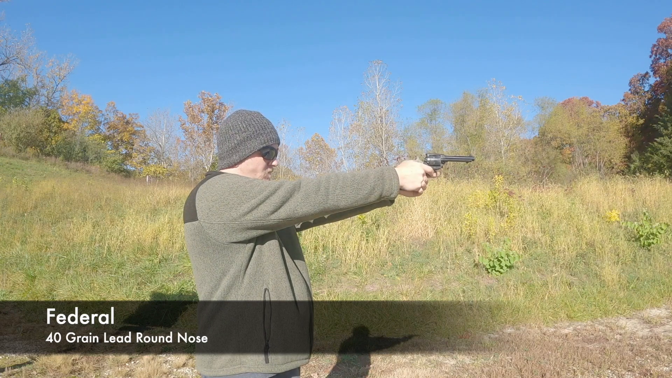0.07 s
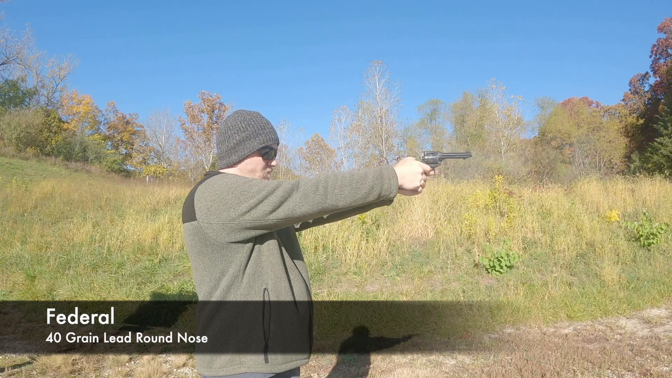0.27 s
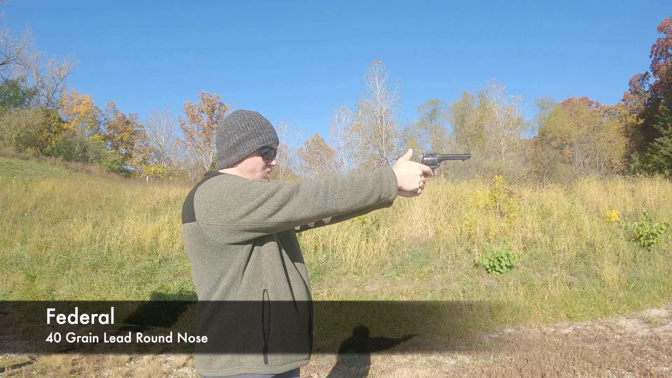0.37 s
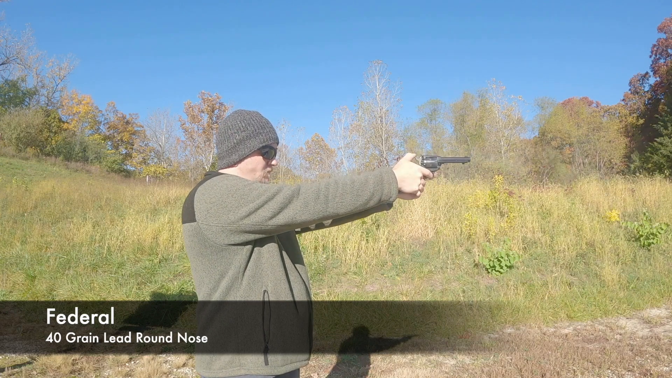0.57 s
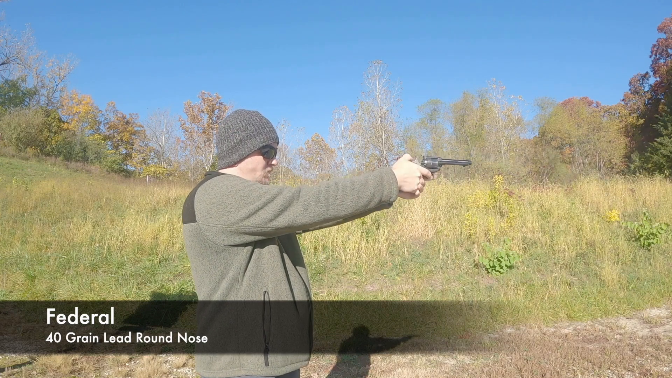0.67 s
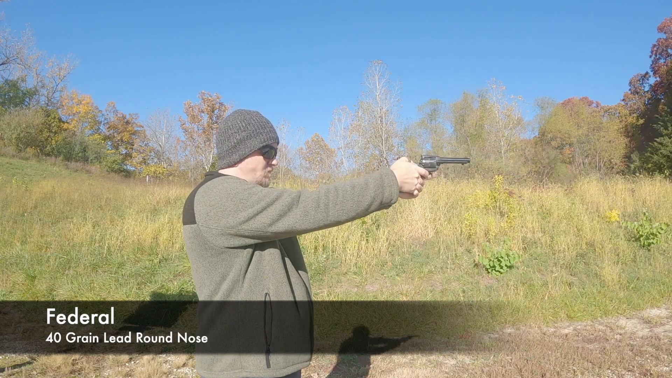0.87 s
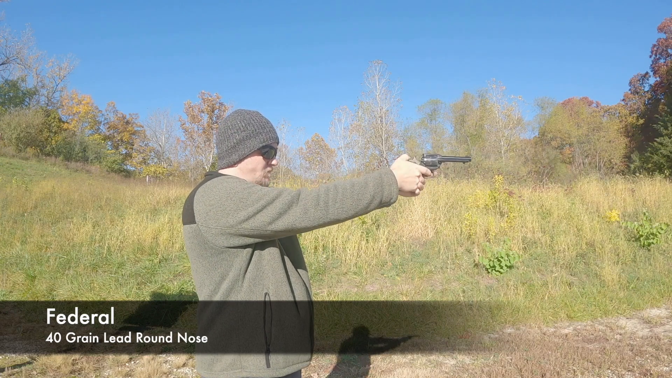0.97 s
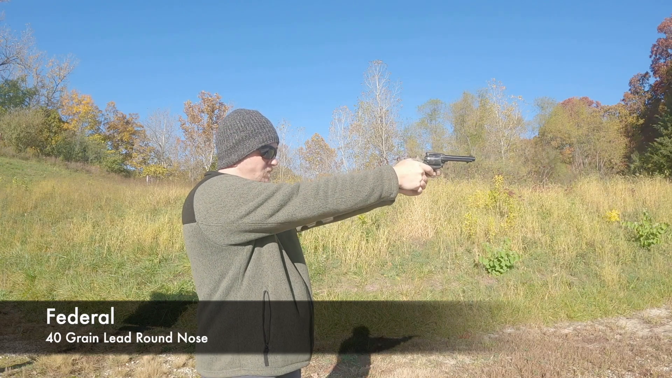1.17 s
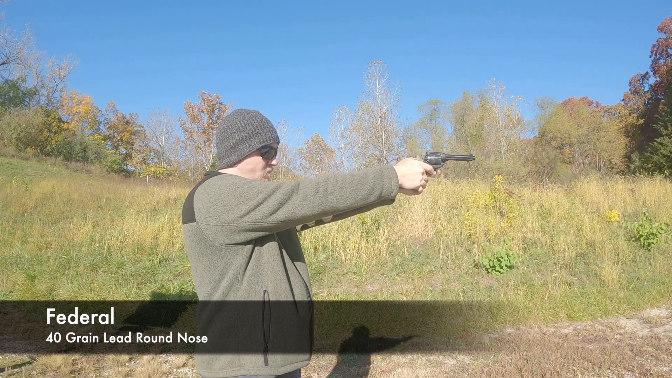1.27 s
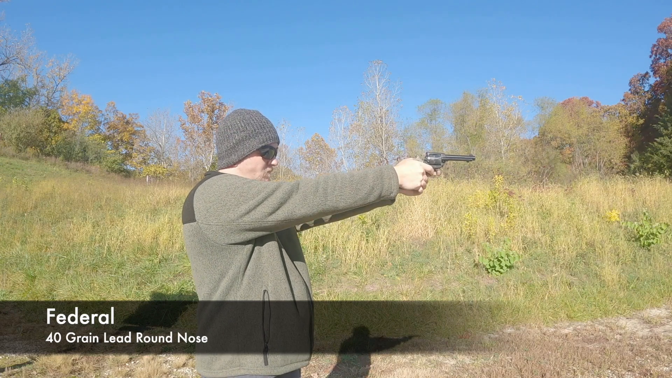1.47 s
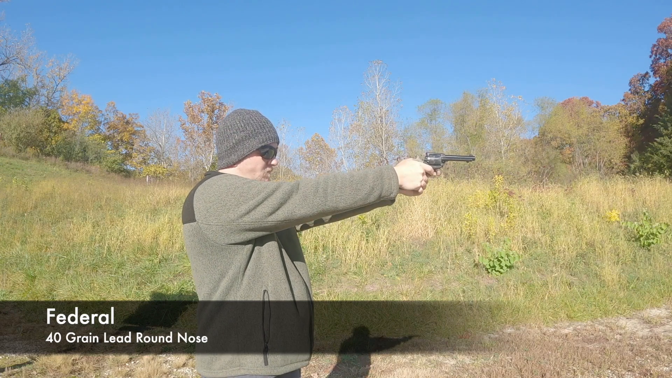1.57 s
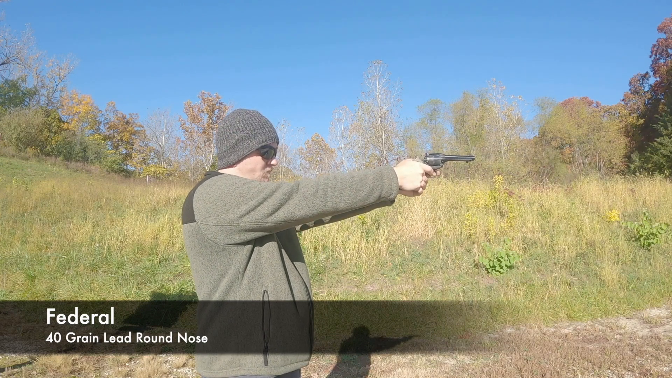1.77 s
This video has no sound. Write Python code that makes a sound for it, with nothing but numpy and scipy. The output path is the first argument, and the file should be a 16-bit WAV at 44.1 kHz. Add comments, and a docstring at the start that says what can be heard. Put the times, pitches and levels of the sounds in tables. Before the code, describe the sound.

One small revolver shot, close and overloading the microphone, arrives as a quick stutter of growing cracks; sharp slaps and a dulling tree-line echo follow, with tiny hammer clicks over a quiet, insect-filled meadow.

```python
"""An autumn meadow: one shot from a small revolver, close to the microphone.
The report stutters in a quick run of growing cracks, built from filtered impulses, and overloads the microphone.
A bank slaps back and slopes near and far return soft thuds, all short noise bursts; the tree line
answers with a long noise wash that dulls as it recedes. The hammer is cocked again with small steel
clicks of decaying sines; insects trill in narrow noise bands and swept tones over faint moving air."""
import sys
import numpy as np
from scipy import signal
from scipy.fft import rfft, irfft, next_fast_len
from scipy.io import wavfile
from scipy.ndimage import uniform_filter1d, map_coordinates

SR = 44100
rng = np.random.default_rng(int(sys.argv[2]) if len(sys.argv) > 2 else 0)


def digitize_waveform(pressure):
    """Quantize a signal to 16-bit integers and store it at the path in sys.argv[1].

    Rows of a 2-D input are taken as channels; values are limited to [-1, 1].
    """
    field = np.atleast_2d(pressure).T
    bounded = np.clip(field, -1, 1)
    quanta = np.round(bounded * 32767).astype(np.int16)
    wavfile.write(sys.argv[1], SR, quanta)


N = 79380  # samples, 1.8 s

SHOT_S = .22815  # the last crack of the stutter


def amp(db):
    """Amplitude factor of a level in dB."""
    return 10 ** (np.asarray(db) / 20)


def unit(x):
    """x scaled to rms 1."""
    return x / np.sqrt(np.mean(x ** 2) + 1e-20)


def clock():
    """Time of every sample in seconds."""
    return np.arange(N) / SR


def along(points, hz):
    """Interpolate (Hz, value) points on a log frequency axis."""
    f, v = np.transpose(points)
    return np.interp(np.log(hz + 1), np.log(f + 1), v)


def filtered(x, gain, causal=False):
    """x times a gain of frequency; a causal one rings only after each hit."""
    m = 2 * next_fast_len(N)
    g = gain(np.fft.rfftfreq(m, 1 / SR))
    if causal:
        # Folding the cepstrum forward in time gives minimum phase.
        cepstrum = irfft(np.log(np.maximum(g, 1e-6)), m)
        cepstrum[1:m // 2] *= 2
        cepstrum[m // 2 + 1:] = 0
        g = np.exp(rfft(cepstrum))
    return irfft(rfft(x, m) * g, m)[..., :N]


def dulled(x, edge_hz):
    """Causal low-pass."""
    return filtered(x, lambda f: 1 / np.sqrt(1 + (f / edge_hz) ** 6), causal=True)


def delayed(x, s):
    """x, s seconds later."""
    return filtered(x, lambda f: np.exp(-2j * np.pi * f * s))


def noise(gain):
    """Coloured noise of rms 1."""
    return unit(filtered(rng.standard_normal(N), gain))


def hiss(points):
    """Noise of rms 1 with a (Hz, dB) colour."""
    return noise(lambda f: amp(along(points, f)))


def bell(x, centre, width):
    """Gaussian bump with a peak of 1; width is its standard deviation."""
    return np.exp(-.5 * ((x - centre) / width) ** 2)


def fade(t, t60):
    """Silence before t = 0, then a steady decay of 60 dB in t60 seconds."""
    return (t >= 0) * np.exp(-np.log(1000) * np.abs(t) / t60)


def meadow():
    """Faint air, steady insect trills and one insect whose quick chirps each fall in pitch."""
    # Colour of the air. Each row: frequency in Hz, relative level in dB.
    air_colour = [(30, -29.5), (100, -31.5), (160, -5.5), (280, -8), (600, 4), (1000, -3.5), (1500, -5),
                  (2500, -13), (5000, -25), (8000, -30.5), (9500, -47), (15000, -49.5)]
    air_db = -60
    # Insect trills. Each row: start in seconds, end in seconds, centre in Hz, level in dB.
    trill_rows = [(-.1, .22, 6985, -69.5), (1.58, 1.9, 7150, -74)]
    trill_width_hz = 90
    chirp_hz, chirp_fall_hz, chirp_width_hz = 7570, 750, 90
    chirps_per_s, chirp_db = 27, -77

    t = clock()
    trills = 0
    for start, end, hz, db in trill_rows:
        gate = uniform_filter1d(1. * (t > start) * (t < end), size=2000)  # softened ends
        trills = trills + amp(db) * gate * noise(lambda f: bell(f, hz, trill_width_hz))

    stroke = (chirps_per_s * t) % 1  # 0 to 1 through each chirp
    pitch_hz = chirp_hz - chirp_fall_hz * (stroke - .5)
    tone = np.sin(2 * np.pi * np.cumsum(pitch_hz) / SR)
    flutter = noise(lambda f: bell(f, 0, chirp_width_hz))  # slow noise roughens the tone
    chirps = tone * flutter * np.sin(np.pi * stroke)
    return amp(air_db) * hiss(air_colour) + trills + amp(chirp_db) * chirps


def crackle():
    """A rough rasp of shaped noise swells through the stutter and fills the gaps between the cracks."""
    # Colour of the rasp. Each row: frequency in Hz, relative level in dB.
    rasp_colour = [(40, -24.5), (100, -9.5), (220, -1), (420, -5.5), (900, 1.5), (1600, 1), (3000, -3.5),
                   (5200, -6), (6200, -15.5), (9000, -19), (10500, -38.5), (15000, -52)]
    # Swell of the rasp. Each row: time in seconds, level in dB.
    rasp_level = [(0.183, -67), (0.1868, -32.5), (0.189, -46.5), (0.199, -36.5), (.208, -26), (.226, -17.5),
                  (.236, -31), (.25, -60), (.27, -110)]
    level = amp(np.interp(clock(), *np.transpose(rasp_level), left=-120, right=-120))
    return filtered(level * rng.standard_normal(N), lambda f: unit(amp(along(rasp_colour, f))))


def report():
    """Shock fronts, a puff of gas and a low thump; the whole stutters, each crack flipped against the last."""
    # The stutter, earliest crack first. Each row: crack in dB, thump in dB, treble edge in Hz.
    stutter = [(-32.5, -32.5, 10000), (-19, -16.5, 6000), (-7.5, -2, 5100), (-4.5, 6, 7000),
               (1, -10.5, 8100)]
    # Paths of the blast to the microphone: cylinder gap, gun and hands, muzzle, two off the ground.
    # Each row: delay in ms, relative level in dB, treble edge in Hz.
    paths = [(0, -1, 10000), (.62, -4, 12000), (1.39, -4, 7000), (5.91, -9.6, 1200), (6.47, -6.5, 1000)]
    # Colour of the crack. Each row: frequency in Hz, gain in dB.
    crack_colour = [(30, -38.5), (120, -13.5), (400, 3.5), (800, 4), (1100, -16.5), (1500, 5), (1800, 2.3),
                    (2200, 3), (2800, -6), (3500, -1.43), (5000, -7.5), (6200, -18), (9000, -23.5),
                    (15000, -37.5)]
    # Short hollow ring under the crack. Each row: frequency in Hz, relative level in dB, t60 in seconds.
    thump_modes = [(103, -22.5, 0.023), (159.8, -11.5, 0.05), (228, -12, 0.042), (338.7, -9.5, .042),
                   (892.7, -17, .036)]
    stutter_s, blast_db = .010667, 22  # spacing of the cracks, gain of crack and gas
    thump_attack_s, gas_db, gas_t60_s = 0.0035, -32, 0.022

    t = clock()
    shock = signal.unit_impulse(N)
    fronts = sum(amp(db) * delayed(dulled(shock, hz), ms / 1000) for ms, db, hz in paths)
    gas = amp(gas_db) * fade(t, gas_t60_s) * rng.standard_normal(N) / 2
    crack = amp(blast_db) * filtered(fronts + gas, lambda f: amp(along(crack_colour, f)), causal=True)

    ring = sum(amp(db) * np.sin(2 * np.pi * hz * t) * fade(t, t60) for hz, db, t60 in thump_modes)
    thump = ring * (1 - np.exp(-t / thump_attack_s))

    out = np.zeros(N)
    for k, (crack_db, thump_db, hz) in enumerate(stutter[::-1]):  # back from the last crack
        blast = dulled(amp(crack_db) * crack + amp(thump_db) * thump, hz)
        out += (-1) ** (k + 1) * delayed(blast, SHOT_S - k * stutter_s)
    return out


def boom():
    """A few slow swings of pressure under the loudest cracks give the shot its weight."""
    centre_s, spread_s, hz, db = .226, 0.0039, 164, -20
    t = clock()
    return amp(db) * bell(t, centre_s, spread_s) * np.sin(2 * np.pi * hz * (t - centre_s))


def grass():
    """The grass close by scatters the blast: a quick noise tail and a faint slower one."""
    # Colour of the scatter. Each row: frequency in Hz, relative level in dB.
    scatter_colour = [(40, -22), (100, -11), (270, 10), (450, 2), (1000, -6), (2000, -1), (4500, -8),
                      (7000, -13.5), (10000, -31), (15000, -44)]
    near_db, near_t60_s = -29.5, 0.13
    field_db, field_t60_s = -45.5, 1.4
    age = clock() - SHOT_S
    tail = amp(near_db) * fade(age, near_t60_s) + amp(field_db) * fade(age, field_t60_s)
    return hiss(scatter_colour) * tail


def returns():
    """Single echoes as brief noise bursts: bright slaps and dull thuds."""
    # Sharp returns from a bank and single trunks. Each row: time in seconds, level in dB, spread in seconds.
    slap_rows = [(0.3591, -26.5, .0013), (0.364, -28.5, 0.001), (0.382, -36.5, .001), (0.483, -35, 0.0045),
                 (0.688, -36.5, 0.0033)]
    # Colour of the slaps. Each row: frequency in Hz, relative level in dB.
    slap_colour = [(60, -43), (150, -23.5), (270, -7), (480, 6.5), (800, -15.5), (1600, 1), (3500, -9.5),
                   (5000, -13.5), (6500, -16.5), (9000, -44), (15000, -46.5)]
    # Dull returns from slopes near and far.
    # Each row: time in seconds, level in dB, spread in seconds, centre in Hz.
    thud_rows = [(0.256, -38.5, .005, 270), (0.306, -45, 0.01, 229), (.398, -37.5, 0.0052, 323),
                 (0.412, -38.5, 0.0053, 175), (0.493, -58, 0.01, 112), (0.593, -39.5, 0.01, 370),
                 (0.679, -37.5, 0.0051, 720), (0.975, -42.5, 0.0026, 562), (1.015, -52, 0.01, 594),
                 (1.243, -43.5, 0.0027, 574), (1.268, -50, .012, 680), (1.301, -44.5, 0.0067, 591),
                 (1.406, -55, 0.046, 592)]
    thud_octaves = .45  # spread of each thud's band

    t = clock()
    slap_level = sum(amp(db) * bell(t, s, spread) for s, db, spread in slap_rows)
    bursts = rng.standard_normal(N) * slap_level
    slaps = filtered(bursts, lambda f: unit(amp(along(slap_colour, f))))

    thuds = np.zeros(N)
    for s, db, spread, hz in thud_rows:
        body = noise(lambda f: bell(np.log2(f + 1), np.log2(hz), thud_octaves))
        thuds += amp(db) * bell(t, s, spread) * body
    return slaps + thuds


def tree_line():
    """Countless small echoes as a noise wash; the later ones have come farther and lost their treble."""
    # Level of the echo. Each row: time in seconds, level in dB.
    echo_level = [(.34, -51), (.375, -44), (.415, -39.5), (.45, -31.5), (.49, -28), (.55, -31), (.64, -38),
                  (.78, -41), (.9, -46), (1.2, -49), (1.4, -53.5), (1.55, -56.5), (1.8, -61.5)]
    # Colour of the wood. Each row: frequency in Hz, relative level at the peak in dB, extra loss in dB per s.
    woods = np.array([(70.4, -54, 18.5), (129.9, -41, -1), (253, -9, 5), (420, 0.5, -0.5), (693, 3, -1.5),
                      (1200, -0.5, 1), (1990, 0, 5.5), (2842, 1, 12), (4510, -7, 19.5), (6970, -17, 31),
                      (9060, -34.5, 41), (14700, -56, 25)])
    peak_s, grain_db, grain_per_s = 0.45, 1.1, 290

    t = clock()
    hz, s, spectrum = signal.stft(rng.standard_normal(N), SR, nperseg=1024)
    peak_db = along(woods[:, [0, 1]], hz)[:, None]
    loss_db_per_s = along(woods[:, [0, 2]], hz)[:, None]
    colour = amp(peak_db - loss_db_per_s * np.maximum(s - peak_s, 0))
    colour = colour / np.sqrt(np.mean(colour ** 2, axis=0))  # the colour alone changes, not the level
    wash = signal.istft(spectrum * colour, SR, nperseg=1024)[1][:N]

    grain = map_coordinates(rng.standard_normal(N), [t * grain_per_s])  # smooth random level
    grainy = unit(wash * amp(grain_db * grain))
    return grainy * amp(np.interp(t, *np.transpose(echo_level), left=-120))


def brush():
    """The brush answers brightly: a swell of noise just ahead of the tree line's peak."""
    # Colour of the brush. Each row: frequency in Hz, relative level in dB.
    brush_colour = [(200, -57), (1500, -23), (2600, -7), (3500, -0.5), (5000, -19), (7000, -17),
                    (10000, -38), (15000, -42.5)]
    centre_s, spread_s, db = .445, .028, -39.5
    return amp(db) * bell(clock(), centre_s, spread_s) * hiss(brush_colour)


def action():
    """Each click of the lockwork briefly rings the hand-damped steel as decaying sines."""
    # Trigger, hammer and cylinder clicks.
    # Each row: time in seconds, relative level in dB, extra level of the two lowest modes in dB.
    clicks = [(0.3706, -25, -8), (0.6106, -37.5, 13), (.6835, -34.5, 10), (0.7367, -37, -11),
              (.821, -32.5, 11.5), (1.0131, -32.5, -6)]
    # Modes of the steel. Each row: frequency in Hz, relative level in dB, t60 in seconds.
    steel = [(3180, 3, 0.0052), (3750, -11.5, .008), (5420, 0.5, 0.0033), (7040, -5.5, 0.0037),
             (10300, -14.5, 0.0044), (12790, -25, .006)]
    # Colour of the clicks. Each row: frequency in Hz, gain in dB.
    click_colour = [(100, -34.5), (1500, -20), (2400, -3), (3100, 0.5), (9000, -0.5), (15000, -13)]
    noise_db, noise_t60_s, attack_s = -17.5, .007, 0.00011

    out = np.zeros(N)
    for s, db, low_db in clicks:
        t = clock() - s
        ring = np.zeros(N)
        for k, (hz, level, t60) in enumerate(steel):
            mode_db = level + low_db * (k < 2) + rng.normal(0, 1)  # no two clicks alike
            ring += amp(mode_db) * np.sin(2 * np.pi * (hz * t + rng.random())) * fade(t, t60)
        tick = amp(noise_db) * fade(t, noise_t60_s) * rng.standard_normal(N)
        out += amp(db) * np.clip(t / attack_s, 0, 1) * (ring + tick)
    return filtered(out, lambda f: amp(along(click_colour, f)), causal=True)


def scene():
    """Nearly mono; only the top treble leans left."""
    # Lean of the treble. Each row: frequency in Hz, dB added on the left and taken from the right.
    treble_lean = [(3000, 0), (5000, 0.05), (9000, 0.15), (13000, 2.5)]
    shot = report() + boom() + crackle()
    echoes = grass() + returns() + tree_line() + brush()
    mono = meadow() + shot + echoes + action()
    return np.array([filtered(mono, lambda f: amp(side * along(treble_lean, f))) for side in (1, -1)])


def record(dry):
    """The microphone overloads: the loudest cracks clip; nothing is kept above the band limit."""
    clip_top, clip_knee, top_hz = 1.0, 24, 15800  # a higher knee clips harder
    clipped = dry / (1 + np.abs(dry / clip_top) ** clip_knee) ** (1 / clip_knee)
    return filtered(clipped, lambda f: f < top_hz)


dry = scene()
out = record(dry)
digitize_waveform(out)
```